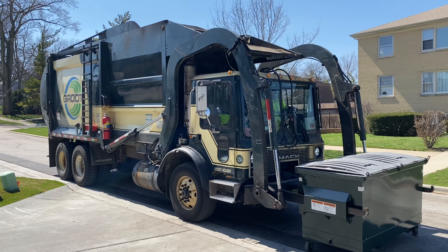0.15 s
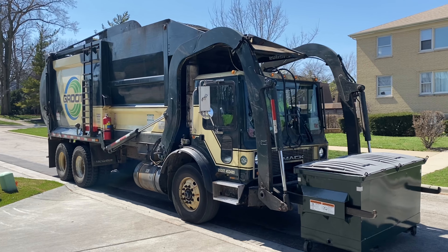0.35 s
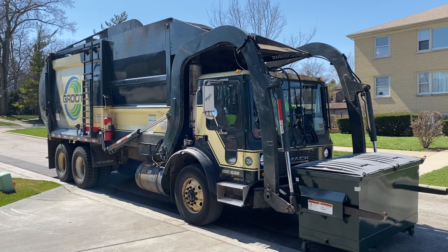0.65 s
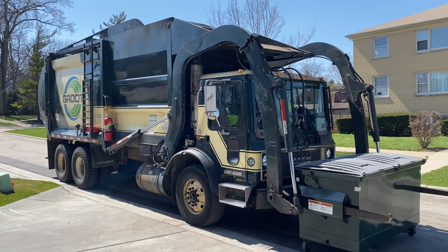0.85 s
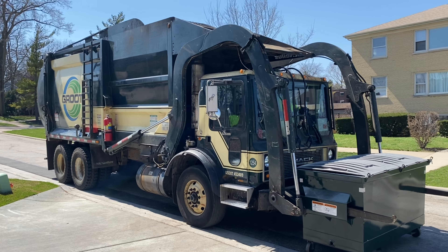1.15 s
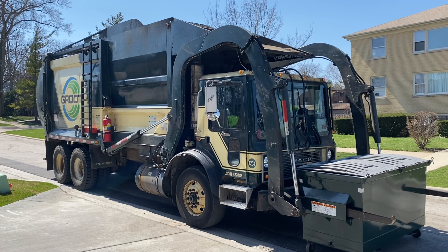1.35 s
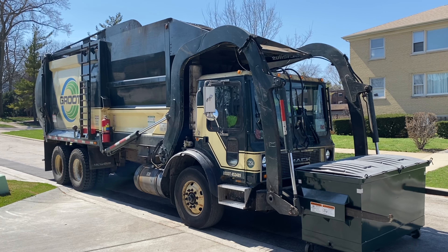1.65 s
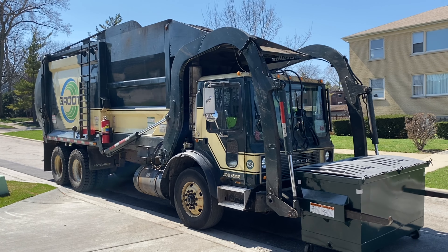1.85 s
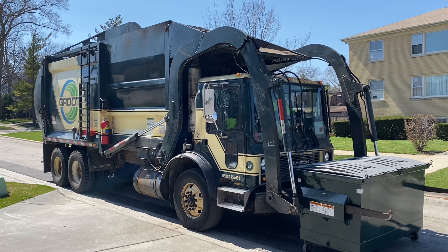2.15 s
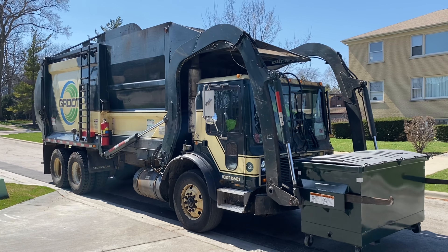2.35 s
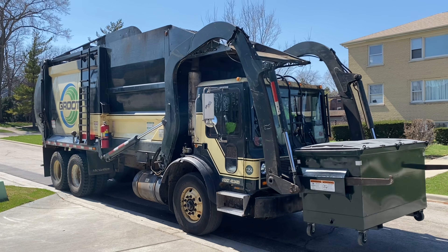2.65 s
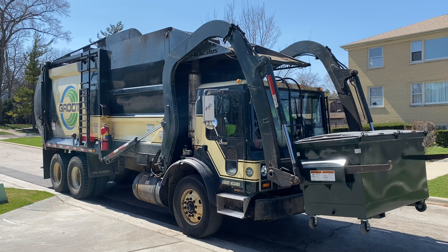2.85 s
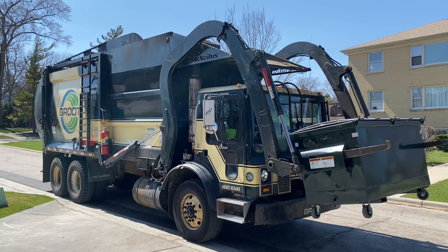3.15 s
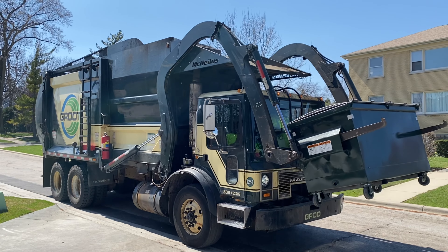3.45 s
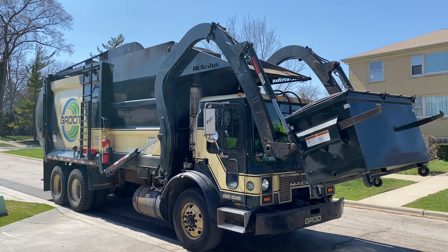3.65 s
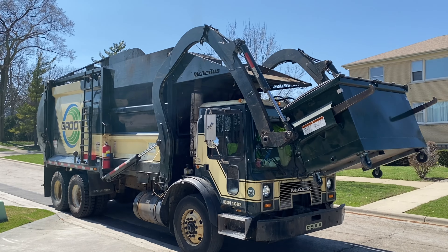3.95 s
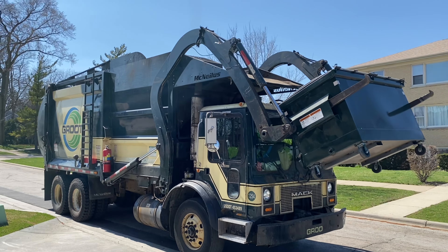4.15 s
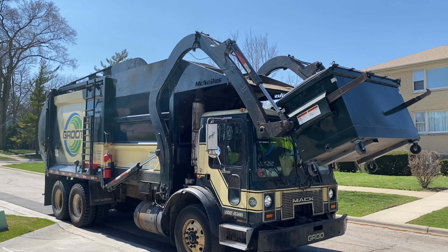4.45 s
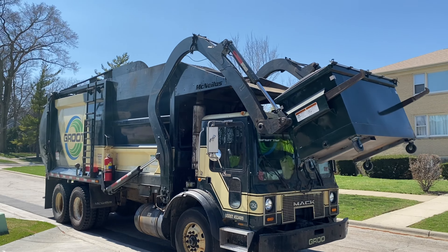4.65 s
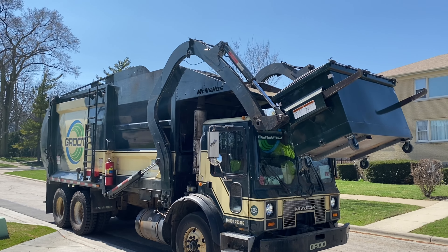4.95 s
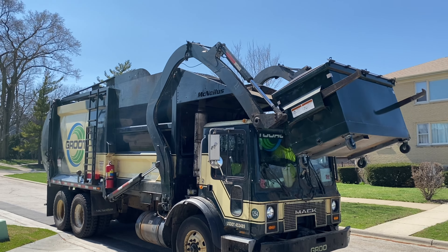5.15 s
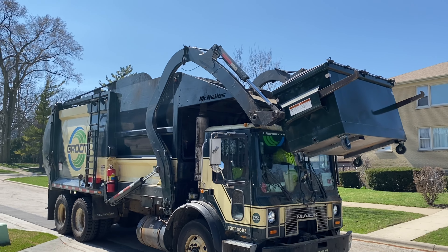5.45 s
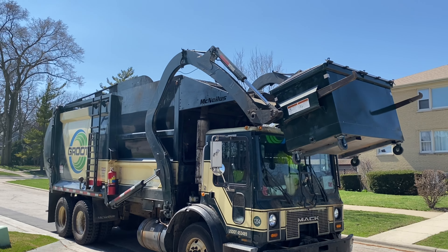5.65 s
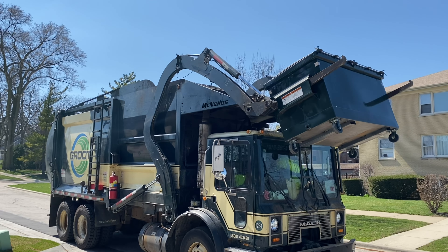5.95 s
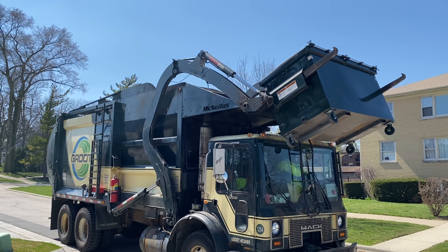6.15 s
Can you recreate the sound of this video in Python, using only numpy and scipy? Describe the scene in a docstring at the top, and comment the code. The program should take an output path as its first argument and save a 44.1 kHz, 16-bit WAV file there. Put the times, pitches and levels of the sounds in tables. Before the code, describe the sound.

A heavy six-cylinder diesel idles close by on an open street, low and throbbing, with knocking and loose metallic chatter. From 0 to 0.5 seconds forks tap and rattle a steel dumpster, with tiny dry squeaks. Around 0.8 to 1.2 a tight run of hollow clangs and panel booms rings out, fittings clinking. At 1.26 brake air bursts in a bright hiss, fading over the next second or so; small squeaks come near 1.45. The engine softens around 1.6 to 1.8, then speeds up. From 2.08 to 2.4 the loudest bangs hit, with deep booms and rattling. At about 3.05 a hydraulic whine and oil rush enter, the engine roaring under load to 3.7, its pitch rising until about 4 and nearly doubling from idle. A pump hum swells around 3.5 to 4. Engine and whine then hold, dipping slightly, with a soft low boom at 5.6 and a small rise toward 6.3.

```python
"""On a street, an idling refuse truck pushes its forks into a steel dumpster, then lifts it.
The dumpster's walls bang and boom as damped modes in a wash of decaying noise, and its fittings clink.
Dry pivots squeak by stick-slip early on, and the air brake vents a burst of turbulence.
The six-cylinder diesel, harmonics and noise locked to its firings, then speeds up;
the hydraulic pump follows as a whine of stroke harmonics filtered by the pipework."""
import sys
import numpy as np
from scipy import signal
from scipy.fft import rfft, irfft, next_fast_len
from scipy.io import wavfile
from scipy.ndimage import uniform_filter1d

SR = 44100
rng = np.random.default_rng(int(sys.argv[2]) if len(sys.argv) > 2 else 0)


def unload_audio(sound):
    """Save the sound as a 16-bit wav file, at the path given as the first command line argument."""
    columns = np.transpose(np.atleast_2d(sound))
    # keep every value between -1 and 1, then stretch to whole-number steps
    steps = np.round(np.clip(columns, -1, 1) * 32767)
    wavfile.write(sys.argv[1], SR, steps.astype(np.int16))


N = 277826
SIZE = next_fast_len(N)  # transform length, samples
TIME, FREQS = np.arange(N) / SR, np.fft.rfftfreq(SIZE, 1 / SR)  # s, Hz

# mean firing rate, from idle to the lift: [t/s, firing rate f/Hz]
FIRING_RATE = [(0, 33.3), (.8, 32.5), (1.5, 32.4), (1.8, 34.5), (2.05, 38.7), (2.45, 45.3), (3, 50.7),
               (3.2, 53.7), (3.4, 58.6), (3.55, 61.8), (3.7, 63.8), (4, 65), (4.35, 65.35), (4.9, 62.95),
               (5.55, 62.4), (5.85, 62.95), (6.3, 66.3)]
# how hard the engine works: [t/s, load level/dB]
ENGINE_LOAD = [(0, -1), (.75, 0), (1.5, -2), (2.55, 0), (3.05, -2.5), (3.3, 0.5), (3.95, 1), (4.7, -0.5),
               (5.35, -0.5), (6.3, 2)]
# relative response of the muffler to the firing harmonics: [f/Hz, level/dB]
MUFFLER_RESPONSE = [(20, -25), (33, -10), (48, -6), (63, 1), (80, -17), (100, -7), (135, -14), (200, -17.5)]
# relative spectrum of the engine's low rumble: [f/Hz, level/dB]
RUMBLE_SPECTRUM = [(15, -42), (25, -26), (35, -17), (48, 0), (58, -2), (85, 2.5), (120, -9), (160, -9.5),
                   (300, -14), (800, -69)]
# relative response of the engine block to the growl lines: [f/Hz, level/dB]
BLOCK_RESPONSE = [(60, -11), (110, -16), (150, -2), (195, 4.5), (230, 9), (300, 0), (325, -9), (352, 8.5),
                  (380, 3), (410, -1), (450, -9), (540, -6.5), (680, -18), (790, -8), (1100, -25)]
# relative spectrum of the combustion knock: [f/Hz, level/dB]
KNOCK_SPECTRUM = [(60, -21), (135, -3.5), (180, 6), (260, 0), (400, 1), (500, 0), (800, -2), (1050, -5),
                  (1250, -2), (1550, -9.5), (2100, -7), (2600, -13), (4000, -13.5), (6000, -24.5),
                  (16000, -39)]
# relative spectrum of loose parts chattering at low speed: [f/Hz, level/dB]
CHATTER_SPECTRUM = [(500, -41), (700, -29), (770, 15.5), (860, 7.5), (930, 10.5), (1100, -35), (1190, 7.5),
                    (1350, -24), (1850, -2.5), (2020, -6), (2300, -32), (5000, -62)]
# relative response of the exhaust stack: [f/Hz, level/dB]
STACK_RESPONSE = [(100, -40), (150, -17), (170, 3), (200, 13.5), (240, 5), (300, 10.5), (365, 0.5),
                  (410, -6), (500, -6), (620, -13)]
# relative strength of a pump harmonic by pitch: [f/Hz, level/dB]
WHINE_RESPONSE = [(380, -1.5), (570, -13), (770, -3), (1150, -9), (1350, -14), (1700, -11), (2300, -13),
                  (2700, -22), (3100, -15), (3700, -18), (4500, -17), (5000, -22), (5350, -29), (5750, -21),
                  (6000, -26), (6250, -21), (7000, -22)]
# resonances of the valve block: [f/Hz, width/Hz, level/dB]
VALVE_RESONANCES = [(1875, 40, -2.5), (2062, 36, -1), (2111, 30, 0), (2182, 43, 5.5), (2435, 32, -5),
                    (3390, 55, -5.5), (6210, 130, -24)]
# relative spectrum of oil rushing through the valves: [f/Hz, level/dB]
OIL_SPECTRUM = [(500, 9), (1500, -2.5), (2200, 11.5), (2600, -1), (3300, 6.5), (5200, -7), (7000, -4),
                (10000, -12.5), (12500, -14.5), (15500, -15.5)]
# forks and dumpster colliding:
# [t/s, level/dB, brightness/(dB per octave), ring-time factor, pitch of the struck part f/Hz]
COLLISIONS = [(0.027, -20, 0, 0.51, 766), (0.109, -22.5, -1, 0.38, 796), (.237, -21.5, .5, 0.4, 850),
              (.339, -22.5, -2, 0.2, 600), (.445, -28.5, 1.5, 0.21, 800), (.771, -28, 2.5, 0.76, 780),
              (0.853, -26, 4, 0.69, 700), (.862, -18.5, 3, .99, 400), (.868, -15.5, -2.5, 0.63, 290),
              (.901, -16, 3.5, 1, 1980), (.931, -16, 1, 0.62, 390), (.962, -21, -0.5, 0.45, 1100),
              (0.992, -19, -4, 0.37, 400), (1.014, -17, 1, 1, 290), (1.071, -21.5, 3, 1, 418),
              (1.132, -20.5, 1, 0.79, 400), (1.184, -25, 1, 0.44, 274), (1.2, -21.5, -5, 0.51, 233),
              (1.46, -27, -0.5, 1, 320), (2.077, -17.5, -2, 0.33, 2000), (2.089, -14.5, -2.5, 0.45, 680),
              (2.106, -22.5, 0, .4, 710), (2.146, -22, -0.5, 0.65, 452), (2.174, -21.5, 6.5, 1, 5150),
              (2.2, -13.5, 1, 0.69, 840), (2.222, -15.5, -2.5, 0.45, 645), (2.262, -19.5, 1.5, 0.92, 835),
              (2.312, -25, 1.5, .4, 950), (2.356, -17.5, -1, 0.32, 1140), (2.401, -26.5, 2.5, 0.38, 800),
              (3.143, -25, -2, 0.27, 800)]
# relative spectrum of the struck sheet steel: [f/Hz, level/dB]
STEEL_SPECTRUM = [(25, -28), (60, -17), (110, 3.5), (170, 2.5), (290, -2), (500, -2), (800, -3),
                  (1300, -10), (2200, -13.5), (4200, -13.5), (6000, -24.5), (10000, -35), (16000, -43)]
# decay of the steel wash, before each blow's ring-time factor: [f/Hz, t60/s]
STEEL_DECAY = [(60, 1), (300, 1), (1000, 0.88), (4000, 0.57), (8000, 0.58), (16000, 0.82)]
# modes of the dumpster walls, before each blow's strain and ring-time factor:
# [f/Hz, relative level/dB, t60/s]
WALL_MODES = [(112.6, 13.5, 0.84), (147.4, 12.5, 0.51), (218, 13.5, 0.17), (273.7, 14, 0.42), (332, 6, 1),
              (400, 13.5, 0.67), (680, 11, 0.21), (738, 7, 0.8), (785, 5, .7), (880, -9, 0.59),
              (1110, -3, 0.66), (1252, 3.5, 0.94), (1900, 4.5, 0.45), (1973, -4.5, 1), (2110, 4.5, 0.63),
              (2770, -2, 0.47), (3040, 1, .7), (3890, -5, .7)]
# the steel walls flexing: [t/s, f/Hz, peak level/dB, swell time/s]
WALL_BOOMS = [(.866, 277, -16.5, 0.034), (.866, 327, -14, 0.011), (0.903, 116, -18, 0.033),
              (.93, 414, -26, 0.026), (1.142, 125, -12.5, 0.011), (1.248, 57.7, -17, 0.12),
              (2.088, 110, -9.5, 0.011), (2.183, 108, -4, 0.011), (2.301, 56.3, -13.5, 0.08),
              (5.6, 83.5, -15, 0.034)]
# dry pivots slipping: [t/s, length/s, central f/Hz, relative level/dB]
PIVOT_SQUEAKS = [(0.027, .09, 7800, -48), (0.213, 0.12, 7750, -35.5), (0.227, 0.063, 2000, -33),
                 (0.39, 0.17, 8300, -50), (0.465, .16, 12200, -54), (.62, 0.15, 10200, -54),
                 (1.435, 0.12, 2200, -29), (1.446, 0.065, 1786, -32), (1.45, .055, 3000, -35)]
# relative spectrum of the escaping brake air: [f/Hz, level/dB]
AIR_SPECTRUM = [(500, -27), (2000, -6.5), (4000, -7.5), (5500, -3), (7200, -5.5), (10000, -9),
                (12300, -8.5), (15000, -6.5), (16000, -8.5)]
# correlation of noise between the two channels: [f/Hz, likeness/(0-1)]
CHANNEL_LIKENESS = [(60, 0.94), (300, 0.86), (600, 0.84), (1200, 0.8), (2400, 0.48), (4500, 0.082),
                    (7000, 1), (16000, 1)]
# phase between the two channels: [f/Hz, phase/rad]
CHANNEL_PHASE = [(0, 0), (2500, 0), (3800, 1.1), (5200, 1.6), (6500, 0), (7100, 0), (9000, 3.1),
                 (11100, 6.3), (13100, 9.4), (15200, 12.6)]

# voices of the engine: (idle dB, dB per doubling of speed, share of the load, added dB in the lull)
THROB_LAW = (-22, -1, 3, -2.5)
RUMBLE_LAW = (-26.5, 3, 1, -10.5)
GROWL_LAW = (-28, 2, 1.55, -9)
CLATTER_LAW = (-26.5, 0.54, 1.07, -4)
CHATTER_LAW = (-31.5, -10, 2, -8)
# envelopes: (start s, attack s, hold s, release s)
LULL = (1.53, 0.18, 0.15, 0.15)  # the engine goes soft just before it speeds up
HEAVE = (2.974, 0.37, 0.23, 0.17)  # the arms take the full weight of the dumpster
SURGE = (3.5, 0.19, .33, 0.18)  # the oil pressure overshoots and the pump hums
BLAST = (1.26, 0.015, 0.21, 0.24)  # the air brake dumps its pressure

IDLE_HZ = 33  # reference firing rate of the laws
LINE_PHASE = rng.random(size=720)  # turns, one for each harmonic of the six-cylinder cycle
HEAVE_THROB_DB = 2.5
CYLINDER_SPREAD_DB, JOLT_SPREAD_DB = 7.2, 6  # rms over cylinders; half the full range over jolts
ROAR_DB, RUN_UP_DB, HEAVE_ROAR_DB = -47, 14.5, 15.5  # steady speed; added by throttle; added in the heave
RUN_UP_HZ_PER_S = 4.5  # gain of firing rate at full throttle

STROKES_PER_FIRING = 3
SHAFT_TWIST = 0.003  # winding of the pump shaft, firing periods rms
LIFT_S, LIFT_RISE_S, WHINE_RISE_S = 3.045, 0.23, 0.063  # the lift valve opens and stays open
# levels before the load and heave terms
OIL_REST_DB, OIL_LIFT_DB, HEAVE_OIL_DB = -41, -35, 7
WHINE_REST_DB, WHINE_LIFT_DB, HEAVE_WHINE_DB = -50.5, -35, -0.5
WHINE_LOAD_SHARE, OIL_LOAD_SHARE = 0.41, 0.28  # how closely the pump follows the load
WHINE_RIPPLE_DB = 4  # greatest deviation either way
SINGING_HARMONIC, SINGING_DB = 21, 8  # this pump harmonic is raised; it reaches about 4 kHz
# a body resonance that the pump strokes sweep through
HUM_HZ, HUM_WIDTH_HZ, HUM_DB, HUM_SURGE_DB = 191, 2.4, -32, 13

# many small resonances of the box, the same for every blow
STEEL_RIPPLE = 2 * rng.random(size=(513, 1)) - 1
STEEL_RIPPLE_DB = 5  # greatest deviation either way
# loose fittings: gain, mean taps per second of each, ring and shake-decay times
CLINK_DB, CLINKS_PER_S, CLINK_T60, SHAKE_S = -17, 45, 0.086, .03
CLINK_RANGE_HZ = (649, 5230)
BLAST_DB, BLEED_DB, BLEED_DB_PER_S = -31, -21, 20.5  # bleed level at its start, then its fall
EDGE_HZ = 15900  # band limit


def amp(db):
    """A level in decibels is twenty times the logarithm of the amplitude gain."""
    return 10 ** (np.asarray(db) / 20)


def unit(x):
    """Normalisation by root mean square makes the mean power 1."""
    return x / np.sqrt(np.mean(x ** 2) + 1e-20)


def at_hz(points, hz):
    """A spectrum is interpolated on a logarithmic frequency axis."""
    f, value = np.transpose(points)
    return np.interp(np.log(hz + 1), np.log(f + 1), value)


def curves(rows):
    """A slowly varying quantity is interpolated linearly in time, column by column."""
    s, *columns = np.transpose(rows)
    return [np.interp(TIME, s, c) for c in columns]


def ramp(start, rise):
    """A linear transition goes from 0 to 1 and stays there."""
    return np.clip((TIME - start) / rise, 0, 1)


def envelope(start, attack, hold, release):
    """The difference of two ramps rises to 1, holds and falls back to 0."""
    return ramp(start, attack) - ramp(start + attack + hold, release)


def drift(rate_hz):
    """Low-passed Gaussian noise gives slow random motion of rms 1."""
    spectrum = rfft(rng.standard_normal(SIZE)) / (1 + (FREQS / rate_hz) ** 4)
    return unit(irfft(spectrum, SIZE)[:N])


def spread(z, hz):
    """Sum and difference of two independent spectra set their correlation at each frequency."""
    same = np.clip(at_hz(CHANNEL_LIKENESS, hz), 0, 1)
    mid, side = z[0] * np.sqrt(1 + same), z[1] * np.sqrt(1 - same)
    return np.array([mid + side, mid - side])


def uneven_colour():
    """A random ripple, new for each noise, makes the gain uneven over frequency."""
    knots = np.arange(0, SR / 2, 28)
    ripple_db = rng.uniform(-5.5, 5.5, len(knots))
    # the ripple grows from nothing at 0 Hz to its full range at 4500 Hz
    return amp(np.interp(FREQS, knots, ripple_db) * np.minimum(FREQS / 4500, 1))


def noise(spectrum, gate=1):
    """Turbulence is broadband noise, here gated in time and then coloured, in stereo."""
    z = rfft(rng.standard_normal((2, N)) * gate, SIZE)
    coloured = spread(z, FREQS) * amp(at_hz(spectrum, FREQS)) * uneven_colour()
    return unit(irfft(coloured, SIZE)[:, :N])


def partial(multiple, firings, flutter):
    """A harmonic locked to the firings flutters in strength and phase through two quadratures."""
    knots = np.linspace(0, TIME[-1], 110)
    in_phase, quadrature = (np.interp(TIME, knots, k) for k in rng.standard_normal((2, len(knots))))
    phase = LINE_PHASE[round(6 * multiple) % len(LINE_PHASE)]
    angle = (2 * np.pi * ((multiple * firings + phase) % 1)).astype(np.float32)
    return (1 + flutter * in_phase) * np.cos(angle) + flutter * quadrature * np.sin(angle)


def engine_level(law, firing_hz):
    """The level of an engine voice follows the logarithm of speed, plus load and lull terms."""
    idle_db, speed_db, load_share, lull_db = law
    running_db = idle_db + speed_db * np.log2(firing_hz / IDLE_HZ)
    return running_db + load_share * curves(ENGINE_LOAD)[0] + lull_db * envelope(*LULL)


def engine_throb(firing_hz, firings):
    """Periodic exhaust pulses excite the muffler at the first three firing harmonics."""
    throb = np.zeros(N)
    for k in range(1, 4):
        throb += amp(at_hz(MUFFLER_RESPONSE, k * firing_hz)) * partial(k, firings, flutter=.16)
    level_db = engine_level(THROB_LAW, firing_hz) + HEAVE_THROB_DB * envelope(*HEAVE)
    return amp(level_db) * unit(throb)


def engine_growl(firing_hz, firings):
    """Unequal cylinders break the symmetry of the cycle and add lines at sixths of the firing rate."""
    growl = np.zeros(N)
    idling_db = np.interp(firing_hz, [35, 60], [-9, 0])
    for k in range(12, 100):
        if k % 6 == 0:
            uneven_db = 0  # a true firing harmonic
        else:
            order_db = -1 if k % 2 == 0 else -7 if k < 38 else -2
            uneven_db = idling_db + order_db + rng.uniform(-2, 2)
        block_db = np.interp(k * firing_hz / 6, *np.transpose(BLOCK_RESPONSE))
        growl += amp(uneven_db + block_db) * partial(k / 6, firings, flutter=.22)
    return amp(engine_level(GROWL_LAW, firing_hz)) * unit(growl)


def engine_clatter(firing_hz, firings):
    """Impulsive combustion modulates noise: each firing knocks in the block and jolts loose parts."""
    firing, since_firing = firings.astype(int), firings % 1  # count; firing periods
    cylinder_db = CYLINDER_SPREAD_DB * rng.standard_normal(size=6)
    knock = 4.4 + amp(cylinder_db[firing % 6]) * np.exp(-since_firing / 3.6)
    jolt_db = JOLT_SPREAD_DB * (2 * rng.random(size=400)[firing] - 0.5)
    jolt = 0.37 + amp(jolt_db) * np.exp(-since_firing / 0.36)
    clatter = amp(engine_level(CLATTER_LAW, firing_hz)) * noise(KNOCK_SPECTRUM, knock)
    return clatter + amp(engine_level(CHATTER_LAW, firing_hz)) * noise(CHATTER_SPECTRUM, jolt)


def diesel(firing_hz, firings):
    """Superposition joins throb, growl and clatter with a rumble of low-frequency noise."""
    rumble = amp(engine_level(RUMBLE_LAW, firing_hz)) * noise(RUMBLE_SPECTRUM)
    tones = engine_throb(firing_hz, firings) + engine_growl(firing_hz, firings)
    return tones + rumble + engine_clatter(firing_hz, firings)


def exhaust_roar(firing_hz, firings, uneven_db=-9, gas_db=-16):
    """Harmonics of the firings and the crankshaft sweep through the resonances of the stack."""
    roar = np.zeros(N)
    for k in np.arange(6, 31) / 3:  # three firings a turn of the crankshaft
        line_db = at_hz(STACK_RESPONSE, k * firing_hz) + uneven_db * (k % 1 > 0)
        roar += amp(line_db) * partial(k, firings, flutter=.15)
    gas = noise(STACK_RESPONSE + [(3000, -60)])
    gain_of_speed = uniform_filter1d(np.gradient(firing_hz) * SR, size=8000)  # Hz per s
    throttle = np.clip(gain_of_speed / RUN_UP_HZ_PER_S, 0, 1) * (1 - envelope(*LULL))
    level_db = ROAR_DB + RUN_UP_DB * throttle + HEAVE_ROAR_DB * envelope(*HEAVE)
    return amp(level_db) * (unit(roar) + amp(gas_db) * gas)


def hydraulic_levels(stroke_hz):
    """Whine and oil hiss rise as the lift valve opens; hum follows a resonance and a pressure surge."""
    resonance_db = -10 * np.log10(1 + (2 * (stroke_hz - HUM_HZ) / HUM_WIDTH_HZ) ** 2)
    hum_db = HUM_DB + resonance_db + HUM_SURGE_DB * envelope(*SURGE)
    heave, load_db = envelope(*HEAVE), curves(ENGINE_LOAD)[0]
    whine_db = WHINE_REST_DB + (WHINE_LIFT_DB - WHINE_REST_DB) * ramp(LIFT_S, WHINE_RISE_S)
    whine_db = whine_db + HEAVE_WHINE_DB * heave + WHINE_LOAD_SHARE * load_db
    oil_db = OIL_REST_DB + (OIL_LIFT_DB - OIL_REST_DB) * ramp(LIFT_S, LIFT_RISE_S)
    oil_db = oil_db + HEAVE_OIL_DB * heave + OIL_LOAD_SHARE * load_db
    return hum_db, whine_db, oil_db


def pipework(hz):
    """Valves and pipes filter the strokes: a few strong resonances over many small, uneven ones."""
    knots = np.arange(0, hz[-1], 45)
    ripple_db = np.interp(hz, knots, 2 * rng.random(len(knots)) - 1) * WHINE_RIPPLE_DB
    peaks = sum(amp(db) / (1 + (2 * (hz - centre) / width) ** 2) for centre, width, db in VALVE_RESONANCES)
    return np.hypot(amp(at_hz(WHINE_RESPONSE, hz) + ripple_db), peaks)


def hydraulics(firing_hz, firings):
    """Pump-stroke harmonics flare as they sweep through pipework resonances; oil flow adds turbulence."""
    stroke_hz = STROKES_PER_FIRING * firing_hz
    hum_db, whine_db, oil_db = hydraulic_levels(stroke_hz)
    pump = firings + SHAFT_TWIST * drift(10.8)
    hz = np.arange(0, 8000, 4)
    response, pressure = pipework(hz), ramp(LIFT_S, 0.26)
    whine = np.zeros((2, N))
    for k in range(2, 37):
        line = partial(k * STROKES_PER_FIRING, pump, flutter=.36 + .01 * k)
        line *= np.interp(k * stroke_hz, hz, response)
        if k > 15:
            line *= pressure  # the strokes turn sharp only under full pressure
        if k == SINGING_HARMONIC:
            line *= amp(SINGING_DB)
        balance = 1 + rng.uniform(-.3, .3) * np.array([1, -1])
        whine += np.outer(balance, line)
    hum = amp(hum_db) * unit(partial(STROKES_PER_FIRING, pump, flutter=0.18))
    oil = amp(oil_db + 2.0 * drift(6.4)) * noise(OIL_SPECTRUM)
    return hum + amp(whine_db) * whine + oil


def add(mix, s, sound):
    """Linear superposition mixes in a sound at a given time."""
    part = mix[:, max(round(s * SR), 0):][:, :sound.shape[-1]]
    part += sound[..., :part.shape[1]]


def steel_wash(bright_db, ring, part_hz, part_db=6, part_octaves=0.21, grind_s=0.0073):
    """Dense modes of sheet steel act as noise with frequency-dependent decay, strongest near the part."""
    hz, t, z = signal.stft(rng.standard_normal((2, SR)), SR, nperseg=1024)
    hz = hz[:, None]
    struck_db = part_db * np.exp(-(np.log2((hz + 1) / part_hz) / part_octaves) ** 2)
    tilt_db = bright_db * np.log2((hz + 20) / 500)
    colour = amp(at_hz(STEEL_SPECTRUM, hz) + struck_db + STEEL_RIPPLE_DB * STEEL_RIPPLE + tilt_db)
    z = spread(z, hz) * colour / np.sqrt(2 * np.mean(colour ** 2))
    # the contact grinds briefly before the decay begins
    decay = np.exp(-np.log(1000) * np.maximum(t - grind_s, 0) / (ring * at_hz(STEEL_DECAY, hz)))
    return signal.istft(z * decay, SR, nperseg=1024)[1][:, :SR]


def wall_modes(ring):
    """A struck panel vibrates in its normal modes, each a sine that decays exponentially."""
    t, modes = TIME[:SR], np.zeros(SR)
    for mode_hz, db, t60 in WALL_MODES:
        # each blow finds the loose walls under a different strain
        strained_hz = mode_hz * rng.uniform(.975, 1.025)
        decay = np.exp(-np.log(1000) * t / (ring * t60))
        modes += amp(db) * decay * np.sin(2 * np.pi * (strained_hz * t + rng.random()))
    return modes / np.sqrt(len(WALL_MODES))


def blow(bright_db, ring, part_hz, panels_db=-5, rise=0.0013, rattle_db=2):
    """An impact excites a few strong panel modes within a dense, rattling wash of others."""
    wash = steel_wash(bright_db, ring, part_hz)
    rattle = amp(rattle_db * unit(uniform_filter1d(rng.standard_normal(SR), size=200)))
    onset = 1 - np.exp(-TIME[:SR] / rise)
    return (wash * rattle + amp(panels_db) * wall_modes(ring)) * onset


def fittings(box, count=10):
    """Shaking taps hinges, casters and latches at random; each clinks in its own decaying modes."""
    keep = np.exp(-1 / (SHAKE_S * SR))
    shake = np.sqrt(signal.lfilter([1 - keep], [1, -keep], box[0] ** 2 + 1e-14))
    t, out = TIME[:SR // 4], np.zeros((2, N))
    for _ in range(count):
        hz = np.exp(rng.uniform(*np.log(CLINK_RANGE_HZ), size=(8, 1)))
        mode_gains = rng.normal(1, .5, size=(2, 8))
        clink = mode_gains @ np.sin(2 * np.pi * hz * t) * np.exp(-np.log(1000) * t / CLINK_T60)
        tapped = rng.random(N) < CLINKS_PER_S / SR
        taps = shake * tapped * np.sqrt(SR / CLINKS_PER_S / count)
        out += signal.oaconvolve(taps[None], clink / np.linalg.norm(clink[0]), axes=1)[:, :N]
    return amp(CLINK_DB) * out


def dumpster():
    """Fork impacts ring the box and shake its fittings; flexing walls boom in swelling, decaying sines."""
    out, t = np.zeros((2, N)), TIME[:SR]
    for s, db, bright_db, ring, part_hz in COLLISIONS:
        add(out, s, amp(db) * blow(bright_db, ring, part_hz))
    out += fittings(out)
    for s, hz, db, swell in WALL_BOOMS:
        shape = t / swell * np.exp(1 - t / swell)  # peaks at 1 after the swell time
        add(out, s, amp(db) * shape * np.sin(2 * np.pi * hz * t))
    return out


def pivots(waver_hz=24):
    """Stick-slip friction squeaks briefly, with an unsteady pitch and a grip that comes and goes."""
    out = np.zeros((2, N))
    for s, length, hz, db in PIVOT_SQUEAKS:
        count = int(length * SR)
        cycles = np.cumsum(hz + waver_hz * drift(140)[:count]) / SR
        grip = unit(amp(4.5 * drift(110)[:count]))
        add(out, s, 2 * amp(db) * np.hanning(count) * grip * np.sin(2 * np.pi * cycles))
    return out


def air_brake():
    """Escaping air is turbulent: a valve snaps open with a blast and the rest bleeds away exponentially."""
    start, attack = BLAST[:2]
    bleed = ramp(start, attack) * amp(BLEED_DB - BLEED_DB_PER_S * (TIME - start))
    return (amp(BLAST_DB) * envelope(*BLAST) + bleed) * noise(AIR_SPECTRUM)


def scene():
    """By superposition, one crankshaft drives engine and pump and the other sources are added."""
    firing_hz, = curves(FIRING_RATE)
    firings = np.cumsum(firing_hz * (1 + .0008 * drift(8))) / SR  # running count
    truck = diesel(firing_hz, firings) + exhaust_roar(firing_hz, firings) + hydraulics(firing_hz, firings)
    return truck + dumpster() + pivots() + air_brake()


def record(dry):
    """Phase separates the channels in the treble, saturation rounds peaks, and a low-pass limits the band."""
    half_phase = .5j * np.outer([1, -1], at_hz(CHANNEL_PHASE, FREQS))
    phased = irfft(rfft(dry, SIZE) * np.exp(half_phase), SIZE)[:, :N]
    rounded = phased / (1 + phased ** 6) ** (1 / 6)
    low_pass = signal.firwin(511, EDGE_HZ, window=("kaiser", 9), fs=SR)
    return signal.oaconvolve(rounded, low_pass[None], "same")


dry = scene()
out = record(dry)
unload_audio(out)
```